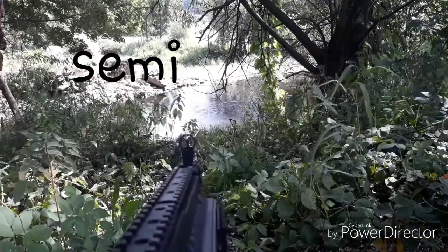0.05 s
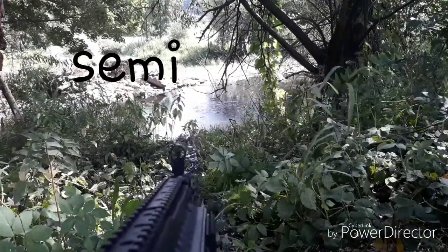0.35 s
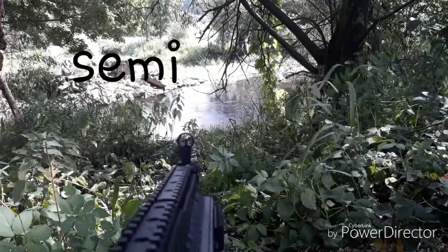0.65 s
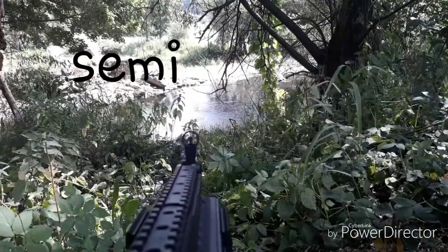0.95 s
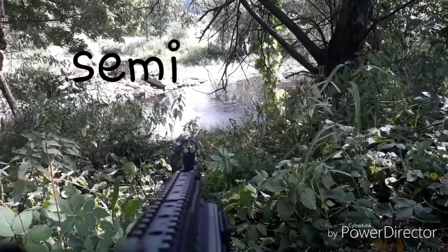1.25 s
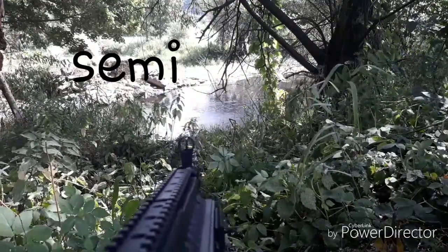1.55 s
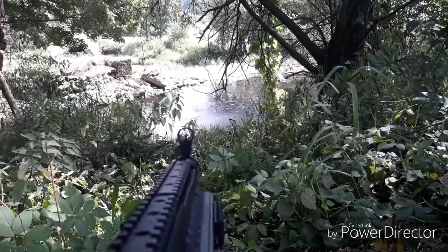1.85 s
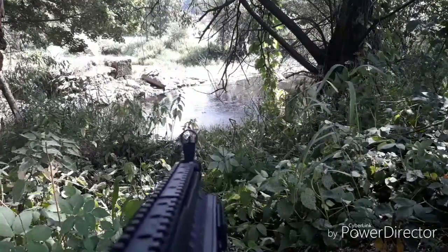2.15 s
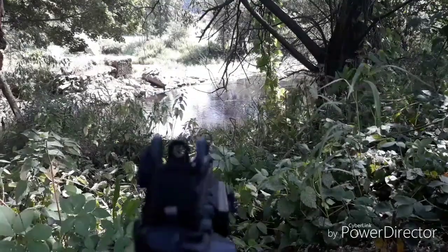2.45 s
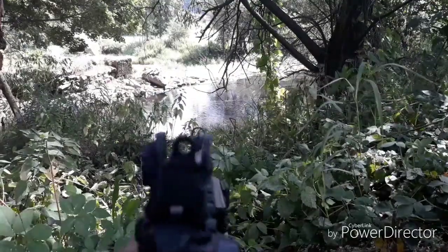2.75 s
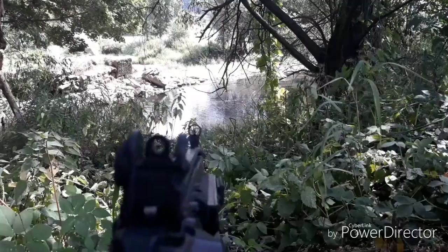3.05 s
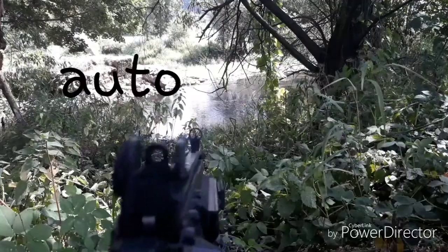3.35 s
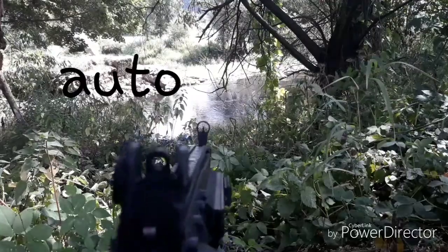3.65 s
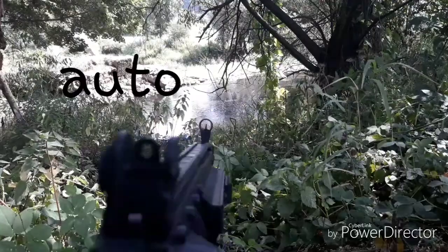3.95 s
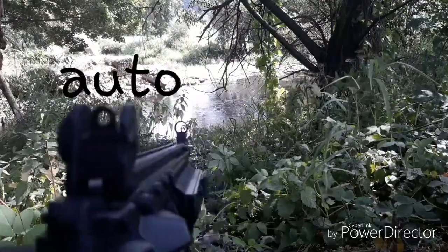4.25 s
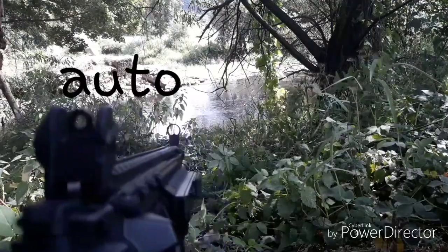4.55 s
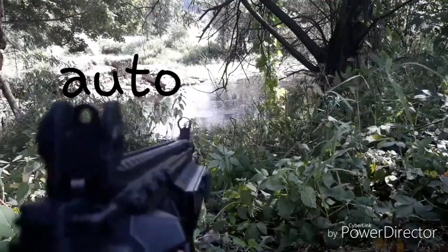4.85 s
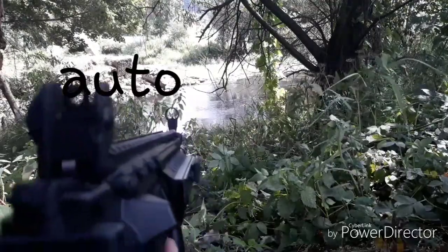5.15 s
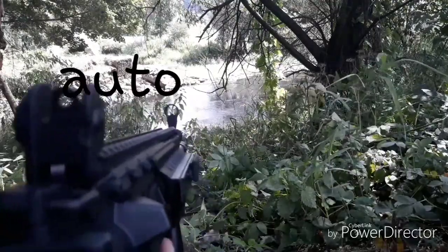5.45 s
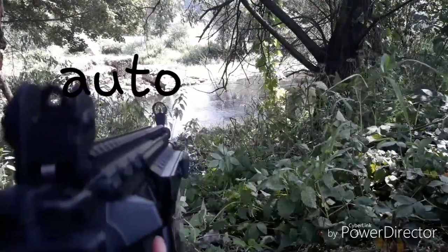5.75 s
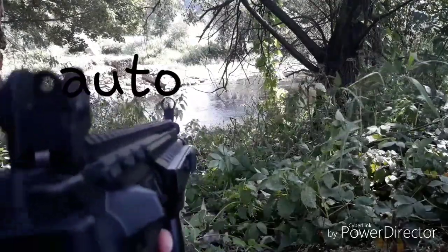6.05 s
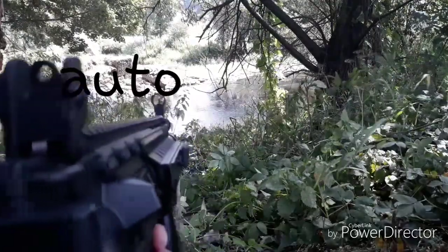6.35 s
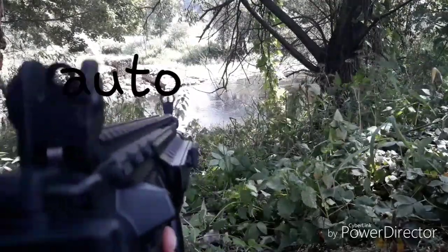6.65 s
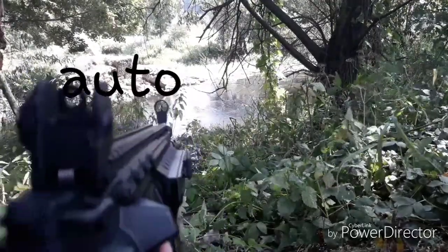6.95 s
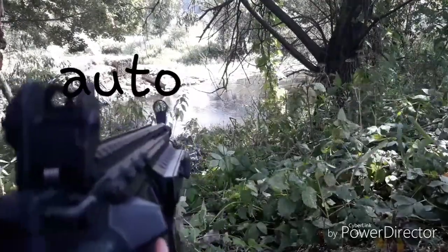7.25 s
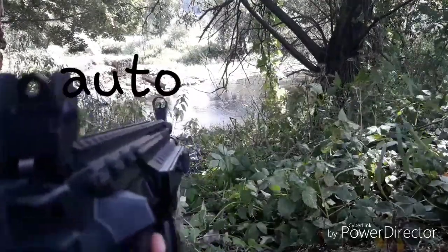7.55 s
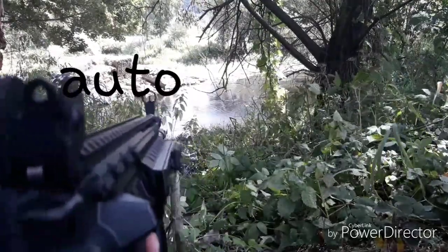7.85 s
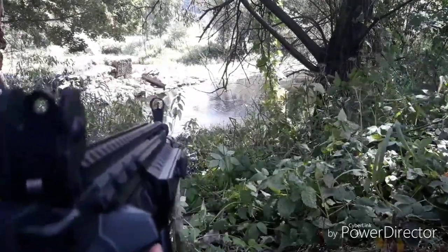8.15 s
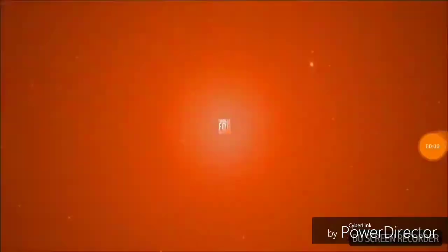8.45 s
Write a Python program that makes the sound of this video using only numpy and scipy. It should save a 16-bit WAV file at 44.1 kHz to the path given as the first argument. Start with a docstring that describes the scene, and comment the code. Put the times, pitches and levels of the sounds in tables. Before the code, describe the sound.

An electric airsoft rifle fires right at the microphone in quiet woodland. Four spaced single shots come first, each a brief gear whine, a pop of air and a sharp piston clack. Rapid bursts follow, of three, two, seven and three shots, with the gears running down and a latch clicking afterwards. Faint handling knocks, rustling air and a distant rumble lie underneath.

```python
"""Airsoft rifle in woodland

An electric airsoft rifle fires single shots, then short bursts, right at the microphone. Each time
the gears whine as they wind the spring, air pops from the muzzle, and the piston slams and rebounds.
The gears coast and the latch clicks; trees return a faint tail over distant rumble and rustling air."""
import sys
import numpy as np
from scipy import signal
from scipy.io import wavfile
from scipy.ndimage import uniform_filter1d, minimum_filter1d

SR = 44100
rng = np.random.default_rng(int(sys.argv[2]) if len(sys.argv) > 2 else 0)


def log_audio(samples):
    """Write samples as a 16-bit WAV file to the path given in sys.argv[1]."""
    # one column per channel
    frames = np.atleast_2d(samples).T
    # limit to full scale, then quantise
    limited = np.clip(frames, -1, 1)
    pcm = np.round(limited * 32767).astype(np.int16)
    wavfile.write(sys.argv[1], SR, pcm)


N = 384111


def gain_of(db):
    """Decibels to amplitude."""
    return 10 ** (np.asarray(db) / 20)


def unit_rms(x):
    """Scales to rms 1."""
    return x / np.sqrt(np.mean(x ** 2) + 1e-20)


def seconds(length):
    """A time axis."""
    return np.arange(int(length * SR)) / SR


def add(mix, s, sound):
    """Mixes a sound in at a time, which may lie before the start."""
    start = round(s * SR)
    sound = sound[max(-start, 0):]
    part = mix[max(start, 0):][:len(sound)]
    part += sound[:len(part)]


def colour(x, spectrum, size=4096):
    """Shapes a sound with a minimum-phase filter of energy 1."""
    hz, db = np.transpose(spectrum)
    bin_hz = abs(np.fft.fftfreq(size, 1 / SR))
    log_gain = np.log(gain_of(np.interp(np.log(bin_hz + 1), np.log(hz + 1), db)))
    pulse = np.fft.ifft(np.exp(np.conj(signal.hilbert(log_gain)))).real
    return signal.oaconvolve(x, pulse / np.linalg.norm(pulse))[:len(x)]


def resonate(x, modes):
    """Adds resonances to a sound."""
    return x + sum(gain_of(db) * signal.lfilter(*signal.iirpeak(hz, hz / width, fs=SR), x)
                   for hz, width, db in modes)


def wander(length, hz):
    """A random drift of rms 1 that changes at about the given rate."""
    knots = rng.standard_normal(int(length * hz / SR) + 2)
    return unit_rms(np.interp(np.arange(length) * hz / SR, np.arange(len(knots)), knots))


# air rustling around the microphone: (frequency [Hz], level [dB])
AIR_SPECTRUM = [(130, -38.5), (220, -9.5), (293, -7), (344, -1.5), (383, -2.5), (483, -4), (538, -4),
                (1460, -4), (6230, -22), (7190, -22.5), (9410, -41), (13900, -42), (15800, -44.5)]
# rumble from far off: (frequency [Hz], level [dB])
RUMBLE_SPECTRUM = [(20, -23.5), (42, -11.5), (57, 1.5), (80, -7.5), (113, 1.5), (170, -5), (230, -13),
                   (450, -48)]
# a distant drone inside the rumble: (frequency [Hz], width [Hz], level [dB])
DRONE_MODES = [(60.6, 3.7, 4), (101, 7.1, 0)]
# the background level jumps, settles, and briefly drops out near the end: # (time [s], air level [dB], rumble
# level [dB], settling time [s])
BED_LEVELS = [(2.32, -44.5, -45.5, 0.004), (3.7, -59.5, -61.5, 0.46), (7.2, -59.5, -54.5, 0.57),
              (8.497, -94, -92, .002), (8.532, -69, -65.5, .003)]

def woodland_bed(flutter_db=0.77, gust_db=0.6):
    """Rustling air and a distant droning rumble settle from one level to the next."""
    t = np.arange(N) / SR
    air_db, rumble_db = -67, -71  # opening levels
    for s, next_air_db, next_rumble_db, settle_s in BED_LEVELS:
        settled = 1 - np.exp(-np.maximum(t - s, 0) / settle_s)
        air_db = air_db + (next_air_db - air_db) * settled
        rumble_db = rumble_db + (next_rumble_db - rumble_db) * settled
    air = unit_rms(colour(rng.standard_normal(N), AIR_SPECTRUM))
    air *= gain_of(air_db + flutter_db * wander(N, 25))
    rumble = unit_rms(resonate(colour(rng.standard_normal(N), RUMBLE_SPECTRUM), DRONE_MODES))
    return air + rumble * gain_of(rumble_db + gust_db * wander(N, 18))


def blend(from_rest, mid_burst, momentum):
    """A value between that for a motor at rest (momentum 0) and in mid-burst (1)."""
    return from_rest + (mid_burst - from_rest) * momentum


def tooth_rate(tension, momentum):
    """The motor runs up to its top speed, then the tightening spring drags it down."""
    start_hz = blend(470.2, 1200, momentum)
    top_hz = blend(1304, 2003, momentum)
    loaded_hz = blend(940, 1133, momentum)
    crest = blend(.58, .38, momentum)  # tension at top speed
    run_up = np.sin(np.pi / 2 * np.minimum(tension / crest, 1))
    drag = (np.maximum(tension - crest, 0) / (1 - crest)) ** 1.5
    return start_hz + (top_hz - start_hz) * run_up - (top_hz - loaded_hz) * drag


TEETH = 10  # per motor turn

def gear_mesh(tooth_hz, rough, throb_db, count=130):
    """Uneven teeth repeat each motor turn and scrape once a tooth; gives sound and teeth passed."""
    turns = np.cumsum(tooth_hz * (1 + .006 * wander(len(tooth_hz), 300))) / SR / TEETH
    orders = np.arange(2, count)[:, None]
    partials = np.cos(2 * np.pi * (orders * turns + rng.random(orders.shape)))
    in_band = orders * tooth_hz / TEETH < SR / 2
    sizes = rng.rayleigh(1, orders.shape) * np.sqrt(1 - orders / count)
    buzz = unit_rms((sizes * partials * in_band).sum(0))
    bite = .5 + np.exp(-(turns * TEETH % 1) / .25)
    scrape = unit_rms(bite * rng.standard_normal(len(turns)))
    grind = np.sqrt(1 - rough) * buzz + np.sqrt(rough) * scrape
    return unit_rms(grind * gain_of(throb_db * wander(len(turns), 600))), turns * TEETH


# the gearbox grinding, heard close up: (frequency [Hz], level [dB])
GRIND_SPECTRUM = [(88, -56), (150, -31), (226, -31.5), (321, -26.5), (598, -8), (817, -7), (1050, -2),
                  (1360, -6), (1850, -7.5), (2170, -6.5), (4370, -6.5), (8470, -18), (9900, -28),
                  (14900, -18), (15800, -33.5)]
# resonances of the gearbox shell: (frequency [Hz], width [Hz], level [dB])
SHELL_MODES = [(680, 37, -8.5), (1086, 16, -2.5), (1880, 37, -5.5), (2750, 350, -3), (3450, 120, -6.5),
               (4310, 150, -2)]
# the main shell resonance, swelling the whine that glides by: (frequency [Hz], width [Hz], level [dB])
WHINE_MODE = [(1060, 150, -4)]
PICKUP_S, LET_GO_S = 0.028, .017  # the gear catches the piston after a slam, lets go before the next

def wind_up(length, momentum, whine_db, unload_db=-7):
    """The gears grind and whine as the spring tightens, and ease off when they let the piston go."""
    t = seconds(length)
    tension = np.minimum(t / (length - LET_GO_S), 1)
    slack = np.clip((PICKUP_S - t) / .004, 0, 1)
    released = np.clip((t - length + LET_GO_S) / .006, 0, 1)
    grind, teeth = gear_mesh(tooth_rate(tension, momentum), rough=.42, throb_db=2.1)
    grind = unit_rms(resonate(colour(grind, GRIND_SPECTRUM), SHELL_MODES))
    phase = 2 * np.pi * (teeth + .04 * wander(len(t), 500))
    whine = sum(gain_of(db + 3 * wander(len(t), 220)) * np.sin(harmonic * phase)
                for harmonic, db in [(1, 0), (2, -9), (3, -17)])
    load_db = -6 - 4 * (1 - tension) ** 2 + unload_db * (slack + released)
    whine = resonate(unit_rms(whine) * gain_of(whine_db + load_db), WHINE_MODE)
    attack = 1 - (1 - momentum) * np.exp(-(t / .016) ** 2)
    level = attack * gain_of(blend(-3, -4.5, momentum) * slack + unload_db * released)
    return (grind + whine) * level * signal.windows.tukey(len(t), .04)


# shots right at the microphone: (slam time [s], gear level [dB], whine trim [dB], blow trim [dB])
SHOT_CYCLES = [ (0.0292, -24.5, -7, -4), (0.9827, -23.5, -3, -0.5), (2.0480, -23, -4.5, 1),
               (3.8411, -11.5, 3, 0.5), (4.6110, -22, 2.5, -3), (4.7247, -19.5, -1.5, 1),
               (4.8340, -20, -2, 2), (5.0406, -29.5, 2.5, -5.5), (5.1752, -22.5, -2.5, -7),
               (6.0401, -25.5, 1, -2), (6.1551, -22, 0.5, -0.5), (6.2653, -21.5, 0, 1),
               (6.3734, -22, -5.5, -0.5), (6.4899, -22.5, -3, -7), (6.5935, -22.5, -4.5, -1),
               (6.7074, -22.5, -4, -1), (7.6618, -25.5, -0.5, 0), (7.7771, -23, -0.5, -4.5),
               (7.8879, -21, -2, -2)]

def cycles(full_rate_s=.122, stopped_s=.16, wind_from_rest_s=0.13):
    """Each shot with the length of its wind-up and the momentum (0-1) left from the shot before."""
    gaps = np.diff([row[0] for row in SHOT_CYCLES], prepend=-1)
    momentum = np.interp(gaps, [full_rate_s, stopped_s], [1, 0])
    return zip(SHOT_CYCLES, np.where(momentum > 0, gaps, wind_from_rest_s), momentum)


def chatter(t, t60, spread_db):
    """A dying swarm of tiny contacts of uneven size, energy 1."""
    swarm = rng.standard_normal(len(t)) * gain_of(spread_db * wander(len(t), 2000) - 60 * t / t60)
    return swarm / np.linalg.norm(swarm)


# small loose parts, heard close up: (frequency [Hz], level [dB])
RATTLE_SPECTRUM = [(100, -29.5), (300, -14), (700, -5), (1050, -1), (1300, -3), (1700, -4), (2400, -8.5),
                   (4300, -6), (7500, -11), (10000, -23), (15000, -18.5)]

def click(t60, spectrum=RATTLE_SPECTRUM):
    """A small part snaps home, peak 1."""
    snap = colour(chatter(seconds(.15), t60, spread_db=0.5), spectrum)
    return snap / abs(snap).max()


def thud(hz, t60):
    """A soft low push through the stock."""
    t = seconds(.15)
    return np.sin(2 * np.pi * hz * t) * gain_of(-60 * t / t60) * (1 - np.exp(-t / 0.0054))


# the spring's dull kick: (frequency [Hz], level [dB])
KICK_SPECTRUM = [(30, -28), (80, -4), (130, 2), (250, -3), (700, -5), (1400, -12), (3000, -28),
                 (12000, -55)]

def spring_release(out, slam_s, gear_db):
    """The gear lets go with a click, and the freed spring shoves the rifle back as the piston flies."""
    add(out, slam_s - .0158, gain_of(gear_db + 9) * click(t60=0.011))
    add(out, slam_s - .0135, gain_of(gear_db + 5) * thud(hz=142, t60=0.03))
    flight = np.hanning(int(.014 * SR))
    shove = np.pad(rng.standard_normal(len(flight)) * flight, (0, SR // 20))
    add(out, slam_s - .018, gain_of(3) * colour(shove / np.linalg.norm(shove), KICK_SPECTRUM))


# receiver and barrel modes: (frequency [Hz], level [dB], t60 [s])
RECEIVER_MODES = [(192, -18.5, 0.033), (400, -8, 0.0089), (708, 4, .03), (950, -0.5, 0.085),
                  (1270, 0, 0.016), (1530, -7, 0.025), (1945, -8, 0.093), (3080, -15, .012),
                  (4270, -15, .02)]

def blow(spectrum, ring_db, chatter_db, chatter_t60):
    """A sharp push, the ring of the receiver, and loose parts shaken by it."""
    t = seconds(.08)
    push = signal.unit_impulse(len(t)) + gain_of(chatter_db) * chatter(t, chatter_t60, spread_db=-1.5)
    ring = sum(gain_of(db - 60 * t / t60) * np.sin(2 * np.pi * hz * rng.normal(1, 0.019) * t)
               for hz, db, t60 in RECEIVER_MODES)
    return -colour(push, spectrum) - gain_of(ring_db) * ring / np.linalg.norm(ring)


# air leaving the muzzle beside the microphone: (frequency [Hz], level [dB])
POP_SPECTRUM = [(30, -30), (70, -11.5), (120, -3), (190, -8.5), (250, -9), (340, -1.5), (680, -2.5),
                (880, -6.5), (1220, 1), (1700, -14.5), (2600, -18), (5000, -25.5), (10000, -51.5),
                (15000, -46.5)]

def muzzle_pop(out, slam_s, blow_db):
    """The flying piston drives air out of the muzzle, and the nozzle clicks."""
    pop = blow(POP_SPECTRUM, ring_db=-9, chatter_db=-2.5, chatter_t60=0.014)
    add(out, slam_s - .0093, gain_of(blow_db + 9.5) * pop)
    add(out, slam_s - .0075, gain_of(blow_db - 12) * click(t60=0.099))


# the piston on the cylinder head, heard close up: (frequency [Hz], level [dB])
SLAM_SPECTRUM = [(30, -32.5), (100, -11), (185, -8), (270, -9), (400, -2), (850, 0.5), (1800, -5),
                 (2400, -11.5), (3300, -8.5), (5200, -17), (8000, -21.5), (10000, -33), (15000, -27)]

def piston_slam(out, s, blow_db):
    """The piston squeezes trapped air, hits in a stutter, jolts the stock and shakes loose parts."""
    add(out, s - .0007, gain_of(blow_db - 5) * np.hanning(32))  # air cushion
    for lag_s, db in [(0, 15), (.0014, 4), (.0027, 8.5)]:
        contact_s = s + lag_s + rng.normal(0, .0001)
        contact = blow(SLAM_SPECTRUM, ring_db=-5.5, chatter_db=-0.5, chatter_t60=0.023)
        add(out, contact_s, gain_of(blow_db + db) * contact)
    add(out, s - .002, gain_of(blow_db - 19) * thud(hz=214, t60=0.027))
    add(out, s, gain_of(blow_db - 14) * click(t60=0.063))


def piston_rebound(out, s, rebound_db):
    """The piston bounces off the cylinder head and settles."""
    bounce = blow(POP_SPECTRUM, ring_db=-7, chatter_db=2.5, chatter_t60=0.0051)
    settle = blow(SLAM_SPECTRUM, ring_db=-3.5, chatter_db=2.5, chatter_t60=0.0076)
    add(out, s, gain_of(rebound_db + 9) * bounce)
    add(out, s + 0.003, gain_of(rebound_db + 4) * settle)


def shots():
    """Each shot: release, pop, slam, rebound, and a click as the gear catches the piston again."""
    out = np.zeros(N)
    for (s, gear_db, _, blow_db), _, momentum in cycles():
        bounce_s = blend(0.0046, .0072, momentum) * rng.uniform(.85, 1.15)
        spring_release(out, s, gear_db)
        muzzle_pop(out, s, blow_db)
        piston_slam(out, s, blow_db)
        piston_rebound(out, s + bounce_s, rebound_db=blend(-14.5, -8, momentum))
        add(out, s + PICKUP_S, gain_of(blow_db - 17) * click(t60=0.038))
    return out


# the stock humming while the gears run loose: (frequency [Hz], width [Hz], level [dB])
STOCK_MODES = [(734, 80, -2), (1095, 32, -7.5), (1810, 88, -11.5), (2760, 120, -1.5)]

def coast(tooth_hz=1133, fall_db_per_s=99.5, braking_db=45):
    """Unloaded gears slow down; the latch ticks over them once a motor turn."""
    t = seconds(.35)
    rattle, teeth = gear_mesh(tooth_hz * np.exp(-t / .22), rough=.6, throb_db=1.6)
    ticks_db = 4.5 * np.exp(-(teeth / TEETH % 1) / .15) * (1 + .5 * wander(len(t), 80))
    rattle = colour(rattle * gain_of(ticks_db), RATTLE_SPECTRUM)
    friction_db = braking_db * (t / t[-1]) ** 2  # the last turns die quickly
    return unit_rms(resonate(rattle, STOCK_MODES)) * gain_of(-fall_db_per_s * t - friction_db)


# the motor coasts when the trigger is let go: (time [s], level [dB])
RUN_DOWNS = [(.035, -29), (0.987, -26), (2.054, -30), (3.845, -14.5), (4.842, -22.5), (5.182, -30),
             (6.715, -35), (7.896, -30)]

def gears():
    """The gears wind up before every shot and run down after a single shot or a burst."""
    out = np.zeros(N)
    for (s, gear_db, whine_db, _), length, momentum in cycles():
        add(out, s - length, gain_of(gear_db) * wind_up(length, momentum, whine_db))
    for s, db in RUN_DOWNS:
        add(out, s, gain_of(db) * coast())
    return out


# latch and trigger, close up, as the gears stop: (time [s], peak level [dB], t60 [s])
LATCH_CLICKS = [(.094, -18.5, 0.033), (.149, -28, .05), (.175, -40, .02), (.214, -39.5, 0.21),
                (.271, -55, .015), (.291, -52, .015), (.332, -53, .015), (1.056, -21, 0.027),
                (1.091, -25, .05), (2.119, -19, .025), (2.162, -25.5, 0.059), (2.170, -22, 0.059),
                (2.236, -36, 0.017), (3.859, -13, 0.045), (3.930, -11, 0.034), (3.985, -14.5, 0.018),
                (5.268, -25.5, .03), (6.764, -27, 0.04), (7.952, -24.5, 0.054), (8.012, -20, 0.036)]
# stock and sling as the rifle moves by the microphone: (time [s], peak level [dB], t60 [s])
STOCK_KNOCKS = [(.77, -51.5, 0.036), (1.844, -55, 0.018), (3.111, -30.5, .02), (3.13, -30, 0.029),
                (4.239, -36, 0.02), (4.248, -41, 0.02), (5.484, -47, 0.044), (5.53, -42, 0.032),
                (5.66, -41.5, 0.029), (7.18, -46, .02)]
# the plastic sound of those knocks: (frequency [Hz], level [dB])
KNOCK_SPECTRUM = [(200, -18), (600, -1.5), (1500, 4), (3500, -7.5), (7500, -14), (10000, -31),
                  (15000, -28.5)]
# hands shifting on the stock: (time [s], level [dB])
HAND_BUMPS = [(8.135, -49), (8.229, -34), (8.468, -29.5)]

def handling():
    """Latch and trigger snap home, the sling knocks, and hands bump the stock."""
    out = np.zeros(N)
    for s, db, t60 in LATCH_CLICKS:
        add(out, s, gain_of(db) * click(t60))
    for s, db, t60 in STOCK_KNOCKS:
        add(out, s, gain_of(db) * click(t60, KNOCK_SPECTRUM))
    for s, db in HAND_BUMPS:
        add(out, s, gain_of(db) * thud(hz=92, t60=0.054))
    return out


# spring and barrel, ringing on after the gears stop: (frequency [Hz], level [dB], t60 [s])
METAL_MODES = [(1051, -1, 0.31), (1767, -8, 0.32), (2191, -12.5, 0.38), (2680, -3, .2), (4440, -12, .4)]

def metal_ring(rifle, ring_db=-36):
    """Every blow and scrape sets the metal parts singing faintly."""
    t = seconds(.6)
    ring = sum(gain_of(db - 60 * t / t60) * np.sin(2 * np.pi * hz * t) for hz, db, t60 in METAL_MODES)
    return gain_of(ring_db) * signal.oaconvolve(rifle, ring / np.linalg.norm(ring))[:N]


# what the surrounding trees send back to the microphone: (frequency [Hz], level [dB])
ECHO_SPECTRUM = [(100, -14.5), (400, -11), (1050, -7.5), (2200, -2.5), (5000, -1), (10000, -14.5)]

def tree_echo(rifle, wet_db=-28, t60=0.31, echoes_per_s=2500):
    """Trunks and leaves scatter a thin tail."""
    t = seconds(.8)
    echoes = rng.standard_normal(len(t)) * (rng.random(len(t)) < echoes_per_s / SR)
    tail = colour(echoes * gain_of(-60 * t / t60) * (1 - np.exp(-t / 0.029)), ECHO_SPECTRUM)
    return gain_of(wet_db) * signal.oaconvolve(rifle, tail / np.linalg.norm(tail))[:N]


# fuller mids until the rifle is raised to the eye: (frequency [Hz], width [Hz], level [dB])
HELD_LOW_MODE = [(1710, 570, -9.5)]

def scene(raised_s=2.3):
    """One microphone at the rifle, with trees all around and the rumble far off."""
    rifle = gears() + shots() + handling()
    rifle = np.where(np.arange(N) / SR < raised_s, resonate(rifle, HELD_LOW_MODE), rifle)
    return (rifle + metal_ring(rifle) + tree_echo(rifle) + woodland_bed())[None]


def record(dry, ceiling=0.88, low_cut_hz=56, high_cut_hz=15650):
    """The microphone feeds a low cut, a fast limiter for the loudest blows, and a steep high cut."""
    thinned = signal.sosfilt(signal.butter(4, low_cut_hz, "highpass", fs=SR, output="sos"), dry)
    allowed_gain = np.minimum(1, ceiling / (abs(thinned) + 1e-9))
    limited = thinned * uniform_filter1d(minimum_filter1d(allowed_gain, size=90), size=90)
    high_cut = signal.firwin(511, high_cut_hz, window=("kaiser", 9), fs=SR)
    return signal.oaconvolve(limited, high_cut[None], "same")


dry = scene()
out = record(dry)
log_audio(out)
```